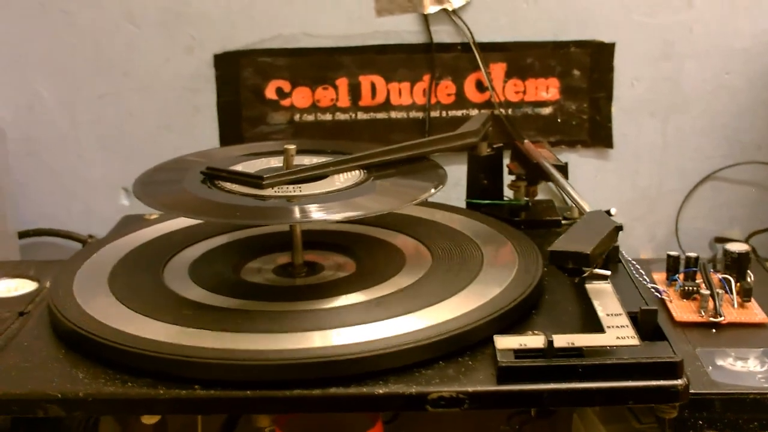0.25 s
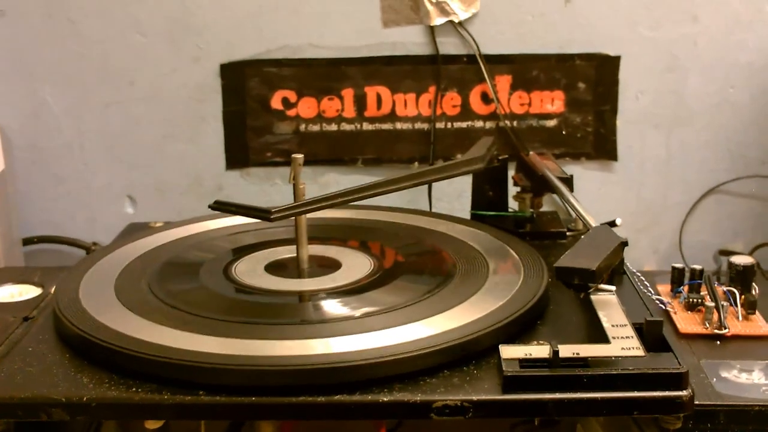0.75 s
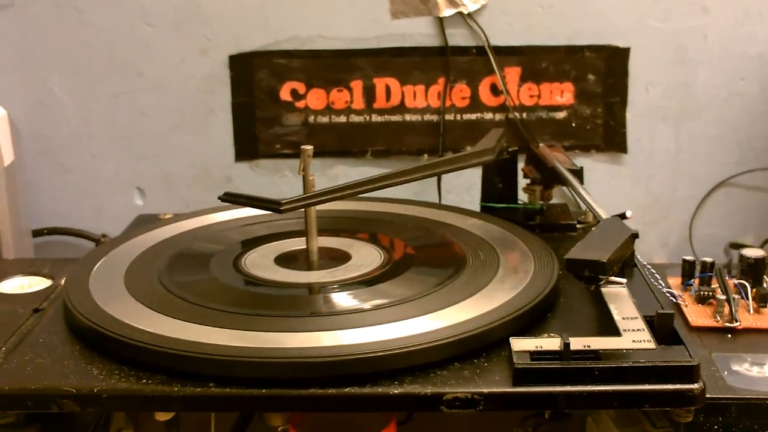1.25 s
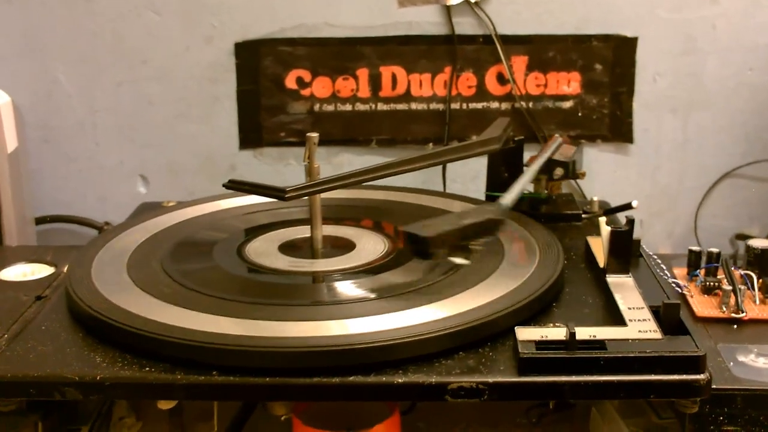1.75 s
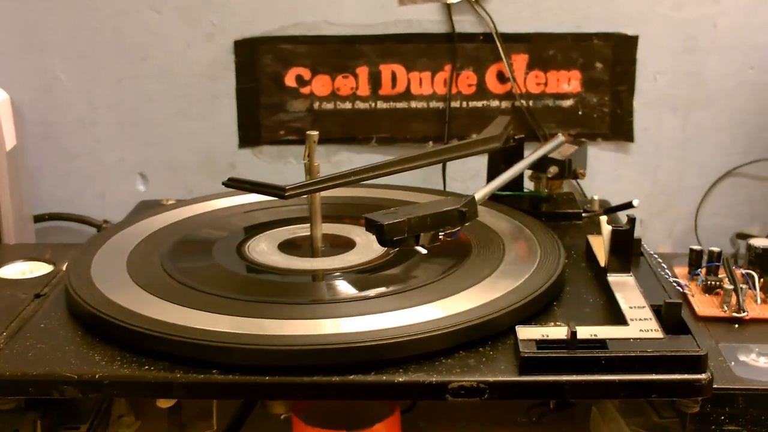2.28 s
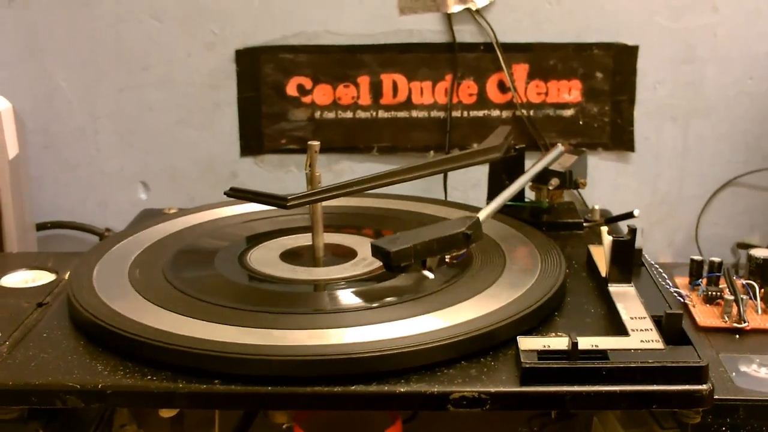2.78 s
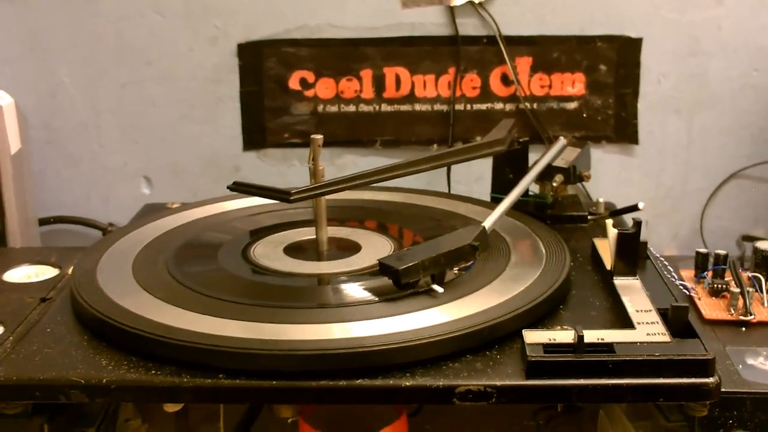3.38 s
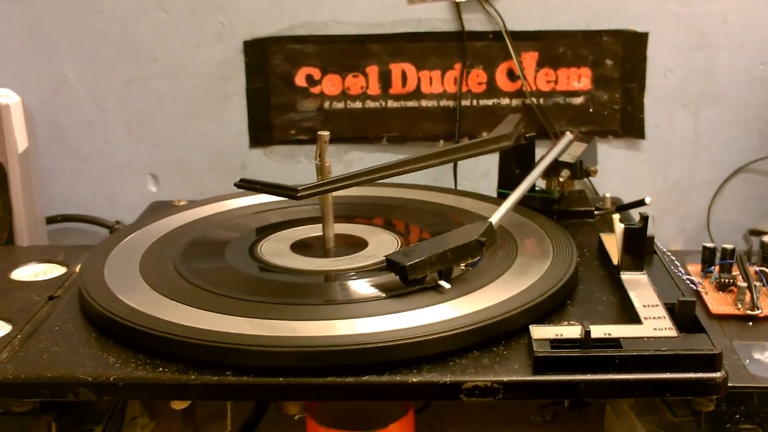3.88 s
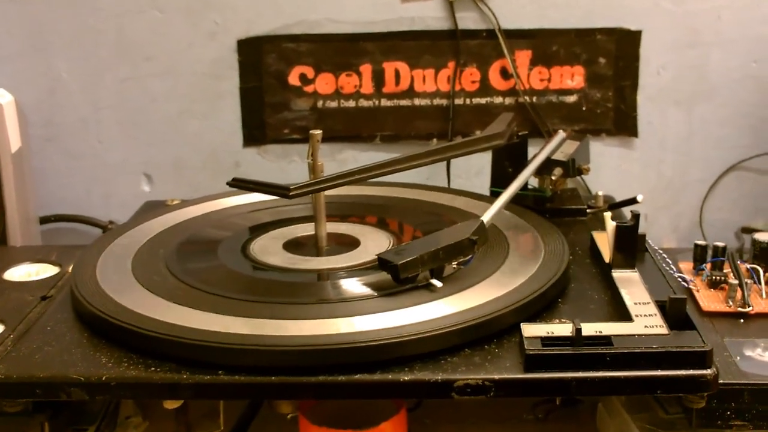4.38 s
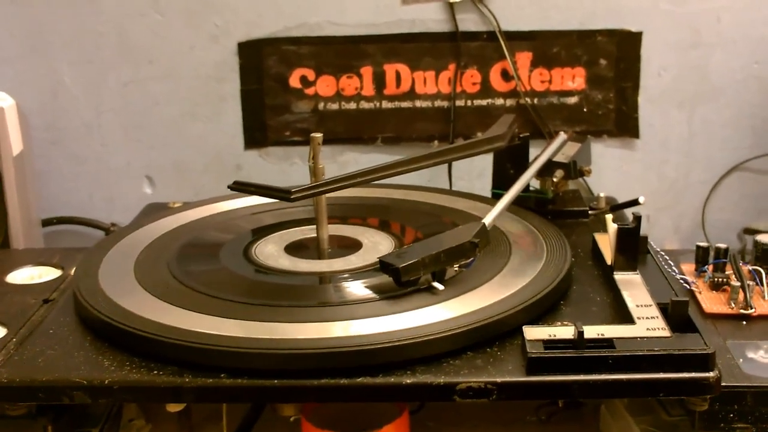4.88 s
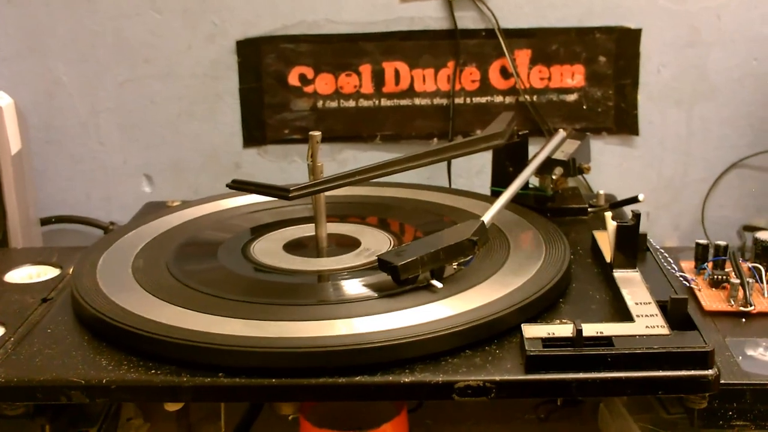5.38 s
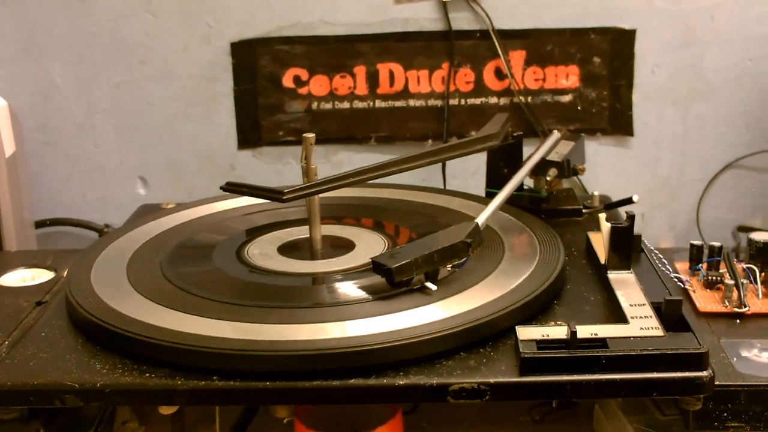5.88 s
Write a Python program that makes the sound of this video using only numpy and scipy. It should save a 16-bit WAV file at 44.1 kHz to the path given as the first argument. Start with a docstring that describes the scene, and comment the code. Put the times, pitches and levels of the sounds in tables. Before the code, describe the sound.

An automatic record changer drops a disc with a clatter, clicks as its arm moves, then plays faint crackle over motor hum.

```python
"""A motor hums, and a single clatters down the spindle of an automatic record changer.
Levers click as the tonearm swings over; each knock rings the part it hits and the deck beneath.
The stylus lands and the cam (the wheel that steers the arm) latches off with two snaps.
A small loudspeaker plays the worn lead-in groove, the same scratches on every turn.
An automatic gain control turns the sound down at the loud knocks and creeps back up."""
import sys
import numpy as np
from scipy import signal
from scipy.fft import rfft, irfft, next_fast_len
from scipy.io import wavfile
from scipy.ndimage import uniform_filter1d

SR = 44100
rng = np.random.default_rng(int(sys.argv[2]) if len(sys.argv) > 2 else 0)


def wav_record(signal):
    """Record a signal, one row per channel, as 16-bit PCM in the file named by sys.argv[1]."""
    frames = np.transpose(np.atleast_2d(signal))
    bounded = np.clip(frames, -1, 1)
    # unit amplitude maps onto the largest positive 16-bit level
    quanta = np.round(bounded * 32767).astype(np.int16)
    wavfile.write(sys.argv[1], SR, quanta)


N = 270892
T = np.arange(N) / SR
LOWERING_S, LANDING_S, CAM_OFF_S = 2.567, 3.301, 3.429   # arm starts down, stylus lands, cam stops
TURN_S = 1.2934   # one turn of the disc

# Every knock (time [s], part, relative level [dB], hardness as treble tilt [dB per octave])
KNOCKS = [(0.051, "stop", -61, 6), (0.399, "spindle", -30, 1), (0.408, "disc", -30, -3),
          (0.4144, "spindle", -19, 0), (.42, "disc", -23, -0.4), (.437, "disc", -7, -1.2),
          (.448, "disc", -12, 1.54), (0.4765, "platter", -9.5, -1), (.487, "platter", -7.5, -.5),
          (.496, "platter", -13, 1.35), (.854, "pusher", -5.5, 0), (1.086, "cam", -39.5, 0),
          (1.152, "cam", -37, -0.5), (1.221, "cam", -39, -3), (1.2952, "lever", -19, 0.5),
          (1.828, "lever", -36, 1), (1.992, "stop", -38, 2), (2.013, "lever", -30, -6.5),
          (2.21, "pusher", -31.5, -4), (2.5603, "stop", -24, 0), (2.567, "stop", -24, -2),
          (2.802, "stop", -42.5, 0), (2.832, "lever", -42, 3), (3.1725, "spring", -40.5, 0.5),
          (3.421, "pawl", -38, -4), (3.429, "pawl", -15.5, 0.5), (3.612, "latch", -12.5, 0)]
# How each part hits (thud [dB], clack [dB], bite [dB], sizzle [dB], ring length [times the usual])
CONTACTS = {"spindle": (6.5, 2.5, -7, -30, 1.15), "disc": (-3.5, 4, -4, -5, 1.24),
            "platter": (-4, 1, -3, -8.5, 1.11), "pusher": (-7, -5.5, -13.5, -19, 1.09),
            "cam": (-9, -10, -19, -22, .5), "lever": (-20, 4.5, -15, -29.5, 0.95),
            "stop": (-5.5, -1, -8, -20.5, 0.98), "spring": (2, 1.5, -.5, -.5, 1.03),
            "pawl": (-4, -6.5, 1, -1, 1.08), "latch": (1, -5.5, -9, -3, 1.22)}
# Peaks and dips in each part's tone (frequency [Hz], width [Hz], boost or cut [dB])
PART_PEAKS_AND_DIPS = {"disc": [(993, 250, 6.5), (1240, 180, 4.5), (1510, 48, -27), (1630, 270, 2.5),
                       (2340, 330, 1), (3110, 450, 3), (3510, 260, 0.5), (4800, 170, 2), (5800, 590, 6.5),
                       (7900, 360, 4), (9920, 320, 11.5), (10760, 330, 7.5)], "pusher": [(875, 55, 5),
                       (1040, 89, 5.5), (1280, 190, 7), (1510, 50, 6.5), (2140, 290, 8.5), (3170, 130, 8),
                       (3870, 250, 6), (4630, 210, 9.5), (5810, 310, 6), (7500, 480, 7.5), (9500, 270, 3),
                       (10100, 670, 6)], "lever": [(1020, 91, 10), (1720, 400, 7), (2660, 150, 1.5),
                       (3130, 200, 2), (3900, 140, 8), (4420, 240, 12.5), (6200, 330, -4), (9500, 460, 4)],
                       "stop": [(253, 36, 10.5)] + [(930, 110, 1.0), (1070, 140, 6.5), (1400, 180, 5.0),
                       (1730, 250, 15.5), (2500, 270, 6.5), (4350, 280, 4), (6100, 400, 8), (6770, 430, 6),
                       (10800, 820, -1)], "spring": [(1710, 250, 18), (3200, 370, 14.5), (3680, 240, 14),
                       (4960, 410, 11), (6560, 510, 8), (8120, 630, 12), (8800, 210, 11),
                       (11340, 790, 9)] + [(14500, 3000, -8)], "pawl": [(970, 18, 12.0), (1310, 91, 3.5),
                       (1480, 90, -2), (1690, 110, 11.0), (2050, 170, 6.5), (2410, 240, 11.5),
                       (3060, 220, 4.5), (3780, 104, 11), (4530, 180, 4.5), (8460, 300, 7),
                       (10600, 820, 4.0), (13100, 1100, 5)] + [(15200, 1600, 12)],
                       "latch": [(620, 65, 8)] + [(910, 24, 6), (1044, 82, 6), (1496, 224, 15.5),
                       (1767, 81, 12.5), (2160, 72, 14.0), (2490, 120, 3), (3400, 180, 4), (4550, 180, 9.5),
                       (4900, 200, 2), (6400, 850, 9.5), (9760, 670, 7), (12010, 570, -2)],
                       "platter": [(392, 110, 10), (990, 77, 17.5), (1250, 93, 9.5), (2400, 250, 8.5),
                       (3590, 290, 3.5), (5850, 470, -3), (10000, 3000, -1.5)],
                       "spindle": [(1150, 290, 23.5)], "cam": [(1030, 350, 14)]}
# Each part's opening crack (level compared with its ring [dB])
CRACK_DB = {"disc": -7.5, "platter": -1, "pusher": 0, "lever": -4.5, "stop": -1.5, "spring": -3, "pawl":
            0.5, "latch": -6, "spindle": -3, "cam": 6}
# The tone of the deck, which carries every knock (frequency [Hz], level [dB])
DECK_TONE = [(40, -24), (130, -16), (250, -0.5), (450, -1), (1500, -2.5), (11000, -4.5), (13500, -8.5),
             (16000, -22)]
# The deck's low resonances and the hollows between them (frequency [Hz], width [Hz], boost or cut [dB])
DECK_PEAKS_AND_DIPS = [(267.6, 27, 10.5), (308, 48, -10.5), (370, 24, 0.5), (460, 61, 11), (530, 40, -6),
                       (750, 54, -1)]
def mechanism():
    """Each knock rings the struck part and the whole deck; heavy contacts thud, hard ones sizzle."""
    out = np.zeros(N)
    for s, part, level_db, hardness in KNOCKS:
        thud_db, clack_db, bite_db, sizzle_db, ring_length = CONTACTS[part]
        contact = [(450, thud_db), (1100, 0), (2200, clack_db), (4800, bite_db), (11000, sizzle_db)]
        contact = [(hz, db + hardness * np.log2(hz / 1100)) for hz, db in contact]
        bands = DECK_PEAKS_AND_DIPS + PART_PEAKS_AND_DIPS[part]
        knock = ring(CRACK_DB[part], crack_s=0.0033, rise_s=0.00031, length=ring_length)
        knock = colour(knock, lambda hz: at_hz(DECK_TONE, hz) + at_hz(contact, hz) + bands_db(bands, hz))
        add(out, s, from_db(level_db + 25.5) * knock)
    return out


# How long the deck and room ring (frequency [Hz], time to fade by 60 dB [s])
RING_TIMES = [(150, 0.21), (400, 0.17), (1040, 0.18), (2760, 0.2), (7280, 0.17), (15000, 0.11)]
def ring(crack_db, crack_s, rise_s, length):
    """A short crack, then countless vibrations and echoes die away, the highest first."""
    t = np.arange(SR // 2) / SR
    hz = np.fft.rfftfreq(len(t), 1 / SR)
    noise_spectrum = rfft(rng.standard_normal(len(t)))
    centres, fade_times = np.transpose(RING_TIMES)
    tail = 0
    for share, fade_s in zip(np.eye(len(centres)), fade_times):
        band = irfft(noise_spectrum * at_hz(np.c_[centres, share], hz), len(t))
        tail += band * from_db(-60 * t / (fade_s * length))
    crack = rng.standard_normal(len(t)) * np.exp(-t / crack_s)
    sound = (rms_one(tail) + from_db(crack_db) * rms_one(crack)) * (1 - np.exp(-t / rise_s))
    # Even out the tone, so no broad range of pitches stands out.
    power = np.abs(rfft(sound)) ** 2
    smooth = np.where(hz < 2000, uniform_filter1d(power, size=70), uniform_filter1d(power, size=400))
    return colour(sound, lambda f: -10 * np.log10(np.interp(f, hz, smooth)))


USUAL_SNAP_HZ = 4470
# Deep scratches on the first turn (time [s], relative level [dB], snap pitch [Hz])
DEEP_SCRATCHES = [(3.442, -23.5, 9900), (3.464, -16.5, 4400), (3.637, -23, 12000), (3.8855, -18, 5800),
                  (3.9415, -10, 3320), (3.947, -15.5, 3730), (4.0679, -13, 3800), (4.080, -14, 3400),
                  (4.1634, -16, 6500), (4.237, -14, 6200), (4.267, -16, 4050), (4.323, -14, 3000),
                  (4.343, -25, 9500), (4.4066, -14.5, 6400)]
# Scuffed patches on the first turn (middle [s], half length [s], relative level [dB])
SCUFFS = [(3.958, 0.07, -40.5), (4.075, 0.031, -30.5), (4.24, 0.17, -35.5)]
def groove_wear():
    """Scratches pop and scuffs crackle each time the turning disc brings them under the stylus."""
    fine_scratches = [(LANDING_S + TURN_S * place, -32 + 3.5 * (2 * depth - 1), USUAL_SNAP_HZ * 3 ** narrow)
                      for place, depth, narrow in rng.random((80, 3))]
    out = np.zeros(N)
    for shift_s in TURN_S * np.arange(3):
        scuff_gain = sum(swell(T - shift_s, *scuff) for scuff in SCUFFS)
        out += scuff_gain * grains(per_s=1500, spread_db=3)
        for s, level_db, snap_hz in DEEP_SCRATCHES + fine_scratches:
            if s + shift_s < T[-1]:
                add(out, s + shift_s, from_db(level_db + 9) * pop(snap_hz))
    return out


def pop(snap_hz):
    """A scratch kicks the stylus and makes it judder; a narrow one snaps higher and more sharply."""
    t = np.arange(SR // 20) / SR
    judder = rng.standard_normal(len(t)) * np.exp(-t / .0015)
    judder = signal.sosfilt(signal.butter(1, 1200, "high", fs=SR, output="sos"), judder)
    push = signal.sosfilt(signal.butter(1, 2500, fs=SR, output="sos"), signal.unit_impulse(len(t)))
    kick = .8 * push + .9 * judder / np.linalg.norm(judder)
    snap_db = 6.5 + 7.5 * np.log2(snap_hz / USUAL_SNAP_HZ)
    return colour(kick, lambda hz: bands_db([(snap_hz, 0.35 * snap_hz, snap_db)], hz))


# The stylus lands or is jolted (time [s], relative level [dB])
BUMPS = [(3.302, -16.5), (3.322, -20), (3.337, -25), (5.912, -16)]
def stylus_bumps():
    """Jolts become dull thumps, because the soft stylus mount lets only low sounds through."""
    jolts = np.zeros(N)
    for s, level_db in BUMPS:
        jolts[int(s * SR)] = from_db(level_db + 14)
    return signal.sosfilt(signal.butter(2, 420, fs=SR, output="sos"), jolts)


# The tones of the groove's crackle, hiss and rasp (frequency [Hz], level [dB])
CRACKLE_TONE = [(59, -44), (100, -23), (197, -19.5), (255, 0), (381, -0.5), (752, -12), (1130, -11.5),
                (1680, -15.5), (2080, -13), (2420, -19.5), (4020, -14), (5190, -20.5), (12900, -34.5),
                (16000, -56)]
HISS_TONE = [(59, -25), (100, -15.5), (219, -5), (255, -1.5), (461, -5.5), (524, -14.5), (801, -13.5),
             (970, -17), (1580, -14), (2860, -21.5), (4110, -18), (8830, -28.5), (12900, -27.5),
             (16000, -32)]
RASP_TONE = [(300, -39), (800, -13), (1120, -3), (1500, -18), (4000, -38)]
def groove():
    """Once down, the stylus picks up pops, thumps and a steady dusty hiss; it rasps once, briefly."""
    crackle = from_db(11) * with_tone(groove_wear() + stylus_bumps(), CRACKLE_TONE)
    dust = grains(per_s=7000, spread_db=3.5)
    hiss = from_db(-52) * rms_one(with_tone(dust, HISS_TONE)) * (T > LANDING_S)
    rasp = rms_one(with_tone(rng.standard_normal(N), RASP_TONE))
    return crackle + hiss + rasp * swell(T, middle_s=5.515, half_s=0.038, level_db=-41)


# Peaks and dips in the speaker cone's tone (frequency [Hz], width [Hz], boost or cut [dB])
CONE_PEAKS_AND_DIPS = [(270, 96, -0.5), (367, 38, 3), (710, 40, 4), (1132, 125, 2), (2070, 210, 5.5),
                       (2540, 290, 3.5), (3120, 160, 7), (4220, 890, 6.5), (5170, 260, -1)]
# The cone beams its treble, so less of it fills the room (frequency [Hz], level [dB])
ROOM_TONE = [(300, -3), (1500, -2), (4000, -5.5), (10000, -5)]
def loudspeaker(x):
    """The small amplifier rounds off the loudest pops; the cone is heard directly and as room echo."""
    ceiling = from_db(-21.5)
    rounded = ceiling * np.tanh(x / ceiling)
    cone = colour(rounded, lambda hz: bands_db(CONE_PEAKS_AND_DIPS, hz) - 2.5)
    room = with_tone(ring(crack_db=-11.5, crack_s=0.015, rise_s=0.0026, length=0.57), ROOM_TONE)
    return cone + signal.fftconvolve(cone, room)[:N]


# The hum of the motor and its idler wheel (pitch [Hz], relative level [dB])
MOTOR_HUM = [(247.6, -64), (398.4, -75), (662.1, -75.5), (791.3, -70.5), (1055, -90), (1200, -79),
             (1453, -79), (1583, -71), (3138, -88)]
# The drive's shaking, amplified through the stylus (pitch [Hz], relative level [dB])
STYLUS_HUM = [(247.6, -60.5), (479.1, -68.5), (791.3, -65), (925.9, -79.5), (1453, -70.5), (1588, -67),
              (1825, -76)]
# The tones of the rumbling drive and the rubbing cam (frequency [Hz], level [dB])
RUMBLE_TONE = [(12, -51), (20, -14.5), (123, -12), (154, -7), (172, -9), (248, -3.5), (319, -8.5),
               (399, -7.5), (698, -14.5), (780, -17), (1030, -14), (1290, -20), (1610, -20), (1810, -23),
               (16000, -37)]
RUB_TONE = [(200, -3), (700, -1), (1300, -3), (1750, -2), (2300, -8), (5000, -15.5), (16000, -27)]
def drive():
    """The motor hums, the idler wheel and platter rumble, and the cam rubs while it steers the arm."""
    stylus_down = np.clip((T - LANDING_S) / .03, 0, 1)
    motor = (1 - stylus_down) * from_db(3.5) * hum(MOTOR_HUM)
    motor += stylus_down * from_db(1) * hum(STYLUS_HUM)
    rumble = rms_one(with_tone(rng.standard_normal(N), RUMBLE_TONE))
    rumble *= from_db(-52.5 + .5 * drift(per_s=17))
    rub_db = np.where(T < LOWERING_S, -62.5, -59)   # harder while it lowers the arm
    rub = rms_one(with_tone(grains(per_s=2500, spread_db=1.5), RUB_TONE))
    rub *= from_db(rub_db + 2 * drift(per_s=24.23))
    return motor + rumble + rub * (T < CAM_OFF_S)


def hum(tones):
    """Steady tones that waver slightly in pitch and level."""
    out = 0
    for hz, level_db in tones:
        phase = 2 * np.pi * np.cumsum(hz + 1.2 * drift(per_s=9)) / SR
        out += np.sqrt(2) * from_db(level_db + 1.5 * drift(per_s=7)) * np.sin(phase)
    return out


def gain_control(x):
    """Loud sound quickly turns the volume down; it comes back up at a steady rate."""
    threshold_db, cut_per_db, start_cut_db = -31, .45, 3.5
    averaging_s, recovery_db_per_s = 0.034, 1.46
    memory = np.exp(-1 / (averaging_s * SR))
    level_db = 10 * np.log10(signal.lfilter([1 - memory], [1, -memory], x ** 2) + 1e-20)
    wanted_cut_db = cut_per_db * np.maximum(level_db - threshold_db, 0)
    recovered_db = recovery_db_per_s * T
    held_db = np.maximum.accumulate(np.maximum(wanted_cut_db + recovered_db, start_cut_db), axis=-1)
    return x * from_db(recovered_db - held_db)


def from_db(db):
    """Turn decibels into a number to multiply by."""
    return 10 ** (np.asarray(db) / 20)


def rms_one(x):
    """Scale a signal so its average strength (rms) is 1."""
    return x / np.sqrt(np.mean(x ** 2) + 1e-20)


def at_hz(points, hz):
    """Read between a table's rows, with frequency spaced in octaves."""
    f, value = np.transpose(points)
    return np.interp(np.log(hz + 1), np.log(f), value)


def bands_db(bands, hz):
    """Decibels that peaks add and dips take away at each frequency."""
    return sum(db / (1 + (2 * (hz - f) / width) ** 2) for f, width, db in bands)


def colour(x, db_at):
    """Boost or cut each frequency by db_at(Hz) decibels."""
    n = 2 * next_fast_len(len(x) // 2 + SR // 20)
    cepstrum = irfft(np.log(from_db(db_at(np.fft.rfftfreq(n, 1 / SR)))))
    # Minimum phase: the filter rings after a sound, never before it.
    cepstrum[1:n // 2] *= 2
    cepstrum[n // 2 + 1:] = 0
    return irfft(rfft(x, n) * np.exp(rfft(cepstrum)))[:len(x)]


def with_tone(x, tone):
    """Filter a sound by a tone table."""
    return colour(x, lambda hz: at_hz(tone, hz))


def grains(per_s, spread_db):
    """Tiny random clicks of uneven size."""
    sizes = from_db(spread_db * np.minimum(rng.exponential(1, N), 4)) * rng.choice([-1, 1], N)
    return rms_one(sizes * (rng.random(N) < per_s / SR))


def drift(per_s):
    """A slow random wobble, about 1 in size."""
    return rms_one(np.interp(T * per_s, np.arange(1000), rng.standard_normal(1000)))


def swell(t, middle_s, half_s, level_db):
    """A volume that rises and falls in a bell shape."""
    return from_db(level_db) * np.exp(-((t - middle_s) / half_s) ** 2)


def add(out, s, sound):
    """Mix a sound in at s seconds."""
    i = int(s * SR)
    out[i:i + len(sound)] += sound[:N - i]


def scene():
    """The changer and its loudspeaker together, in one channel."""
    return (mechanism() + loudspeaker(groove()) + drive())[None]


def record(dry):
    """Gain control, then a steep cut of the highest treble."""
    treble_cut = signal.ellip(12, .1, 90, 16100, fs=SR, output="sos")
    return signal.sosfilt(treble_cut, gain_control(dry))


dry = scene()
out = record(dry)
wav_record(out)
```